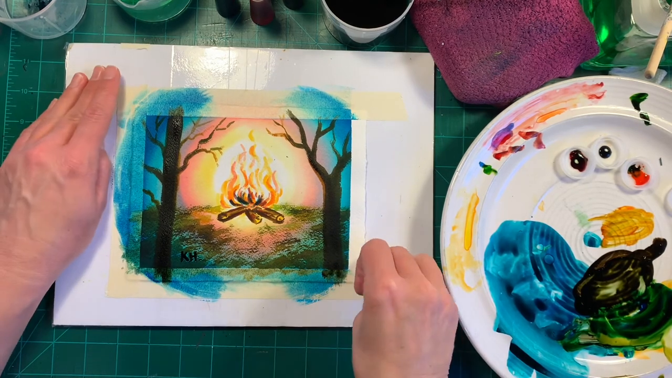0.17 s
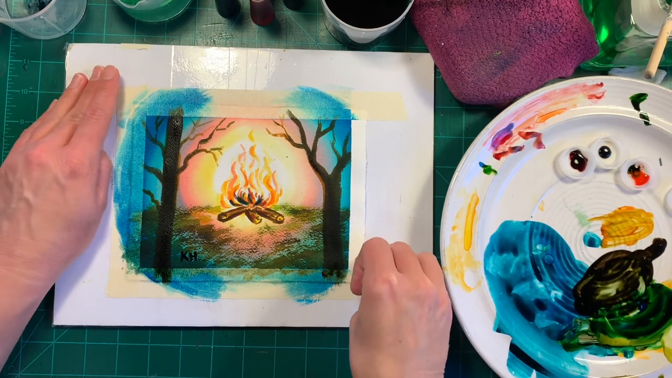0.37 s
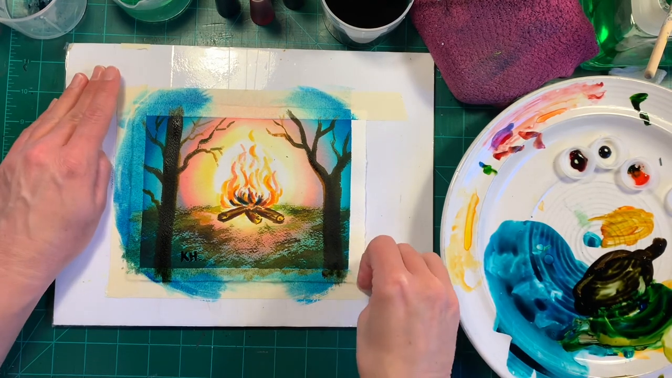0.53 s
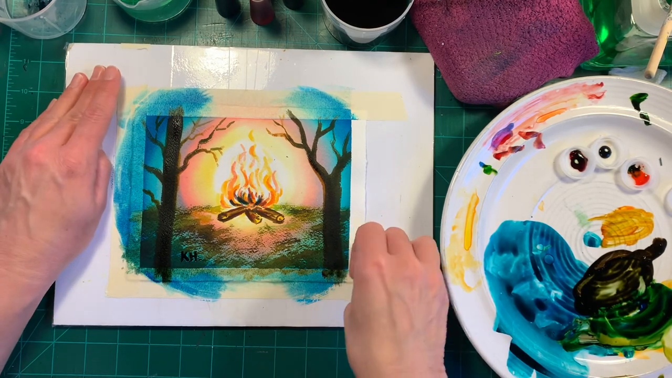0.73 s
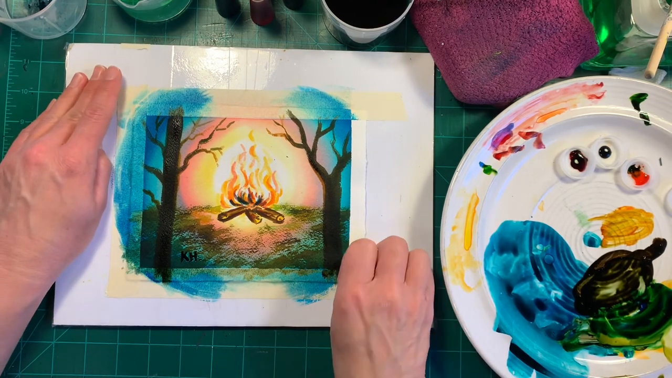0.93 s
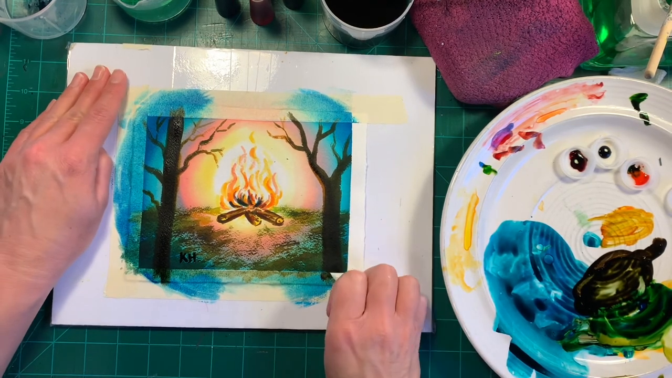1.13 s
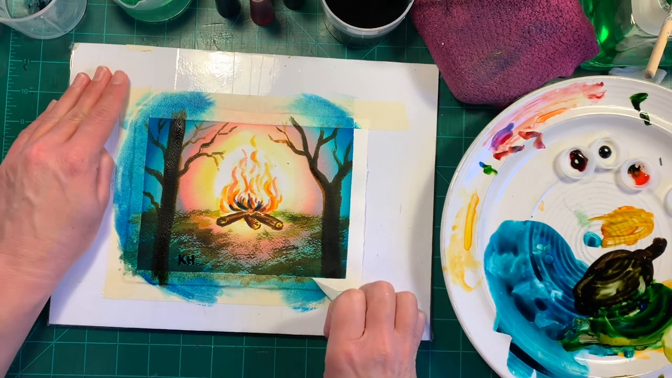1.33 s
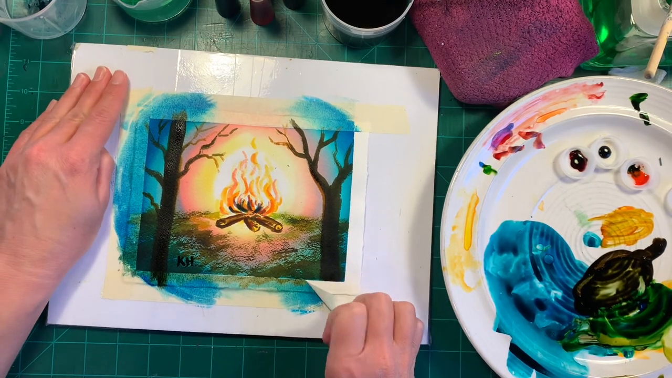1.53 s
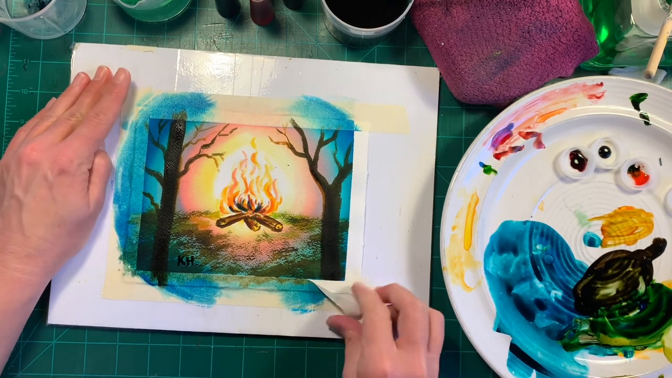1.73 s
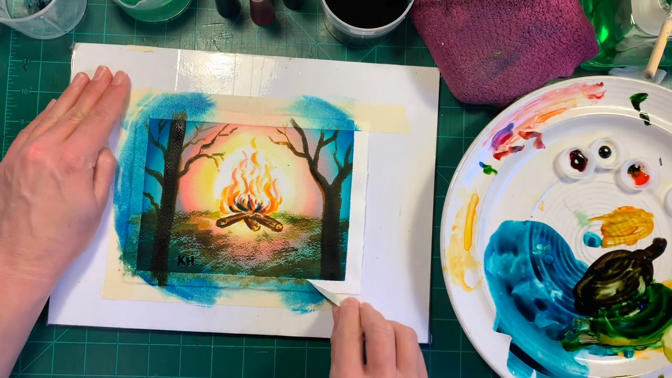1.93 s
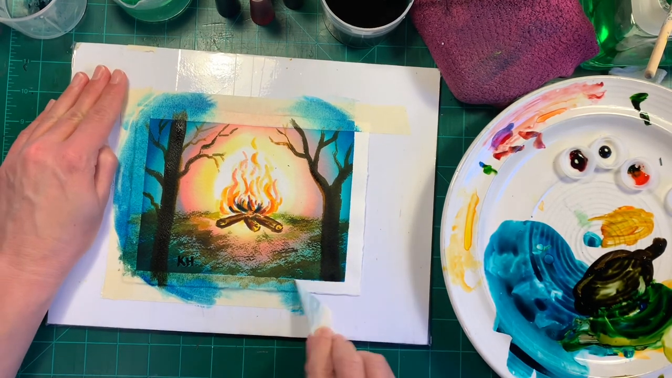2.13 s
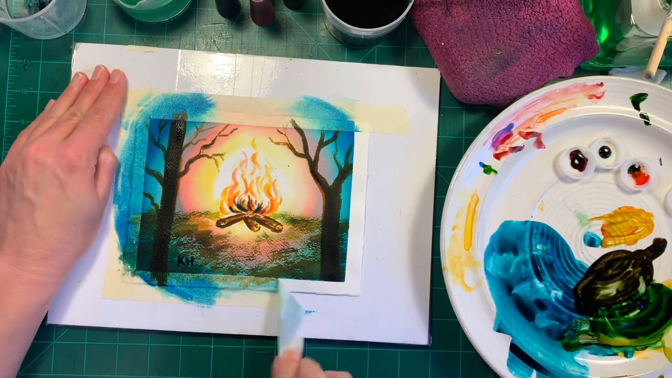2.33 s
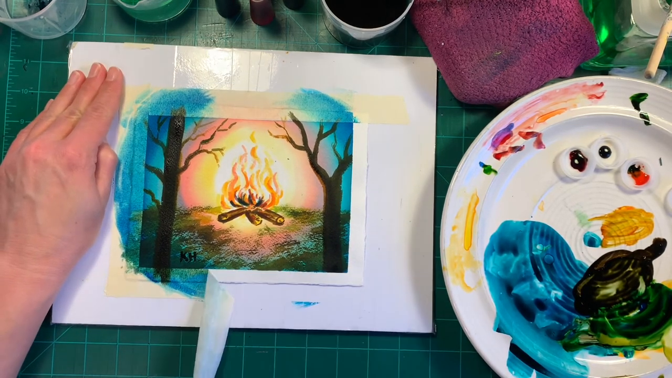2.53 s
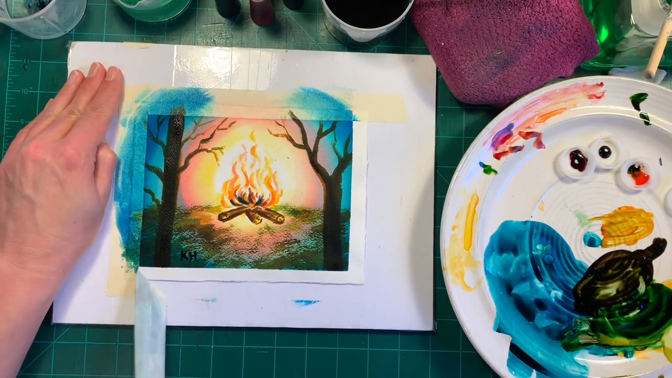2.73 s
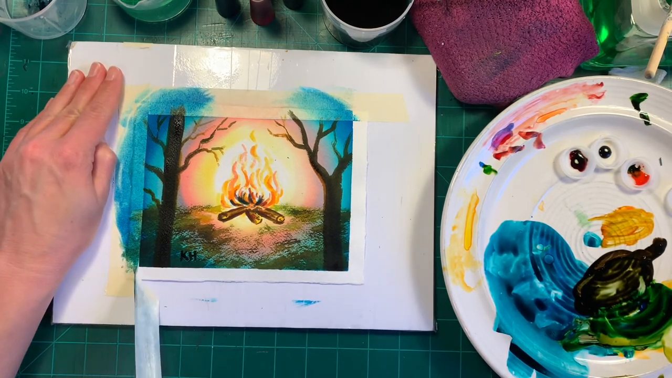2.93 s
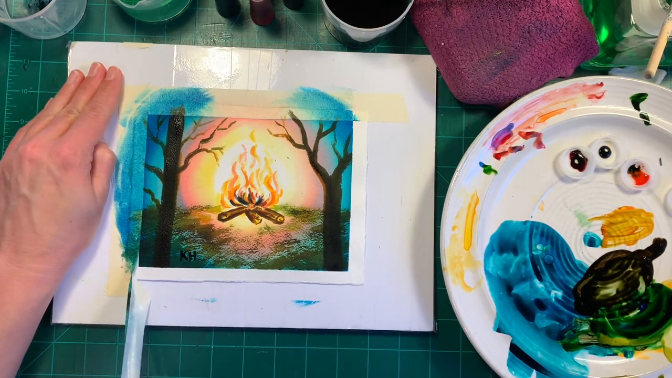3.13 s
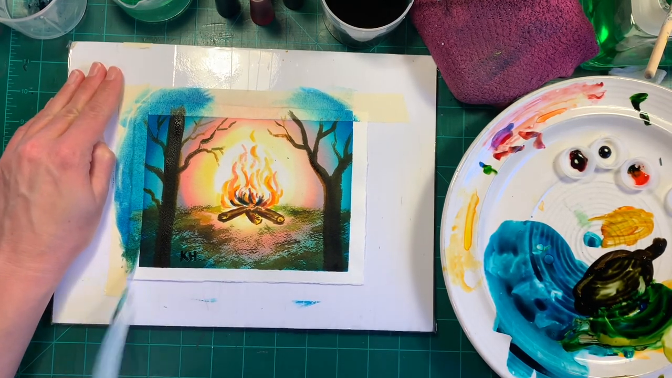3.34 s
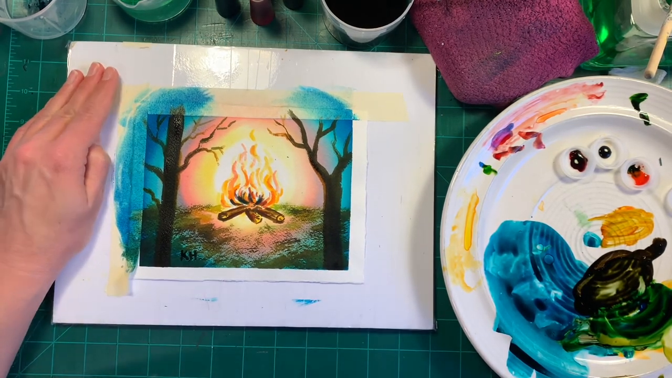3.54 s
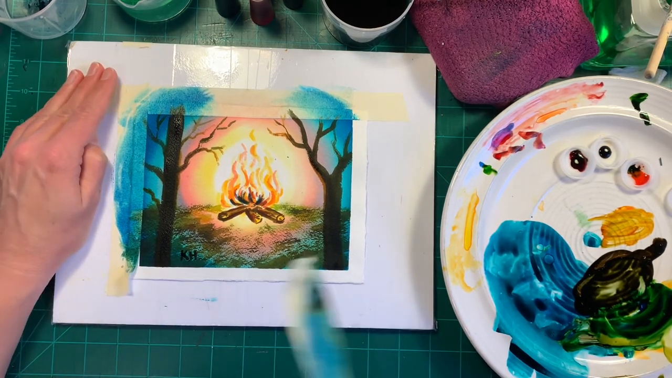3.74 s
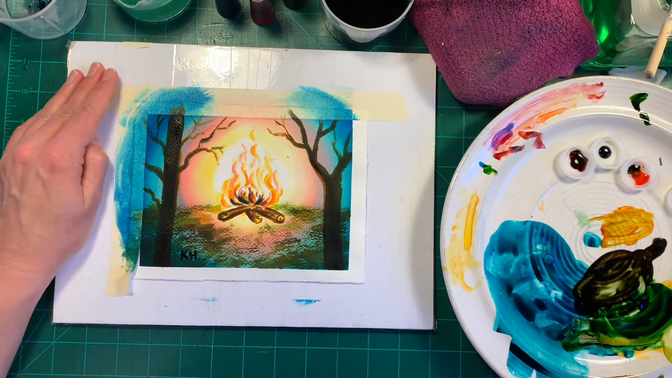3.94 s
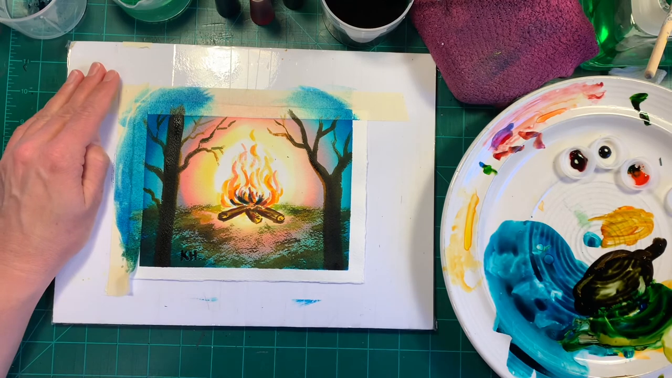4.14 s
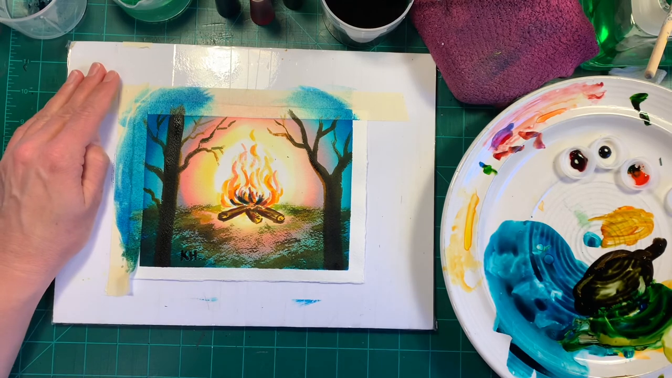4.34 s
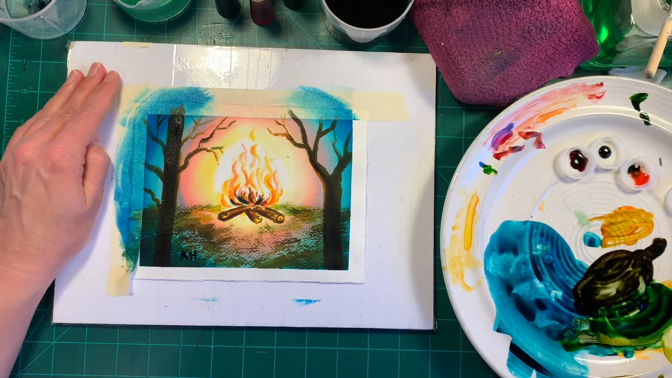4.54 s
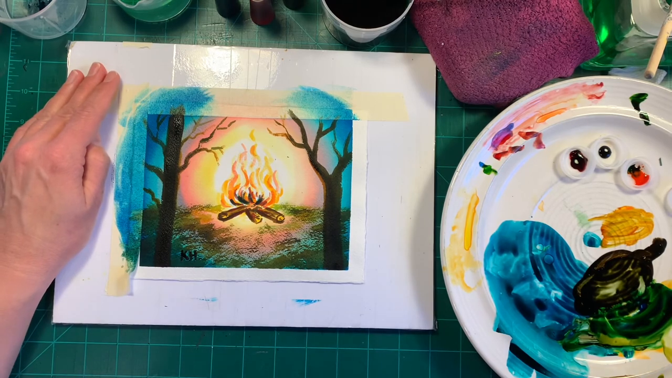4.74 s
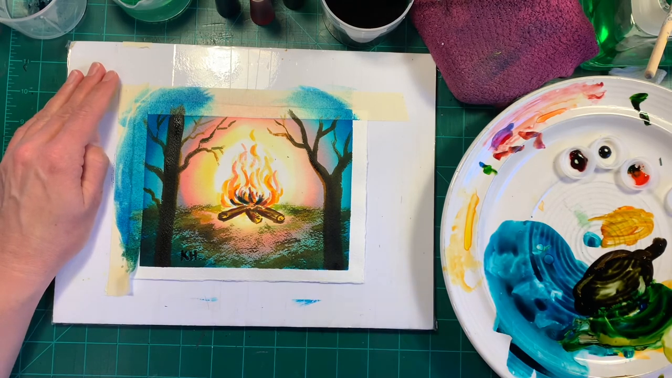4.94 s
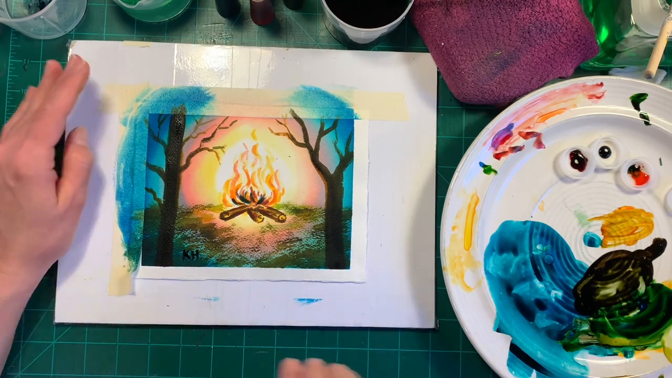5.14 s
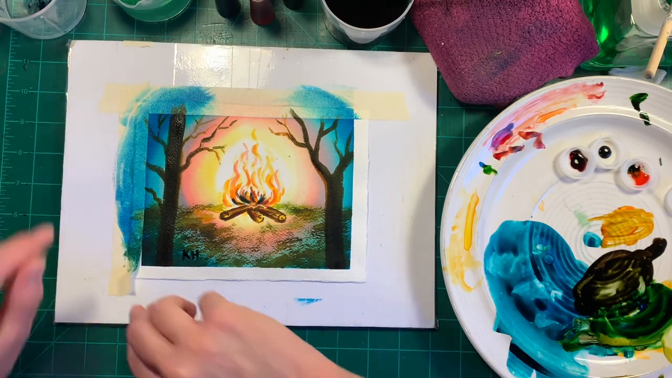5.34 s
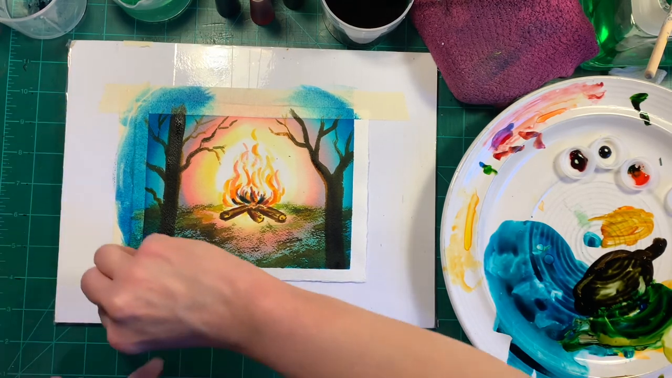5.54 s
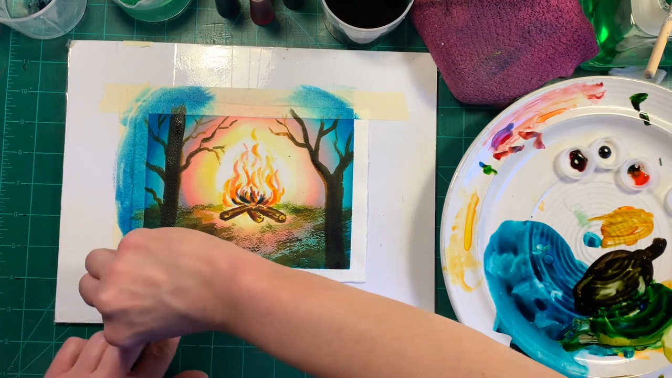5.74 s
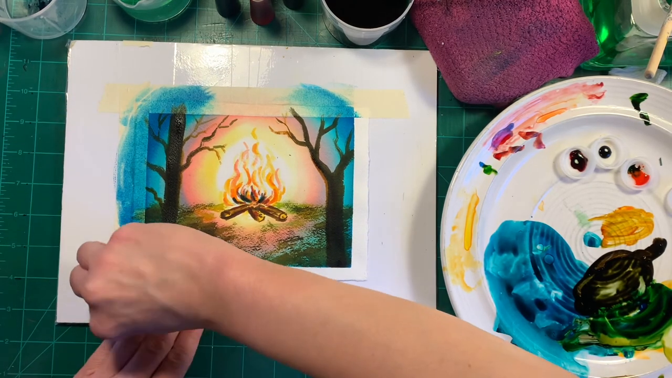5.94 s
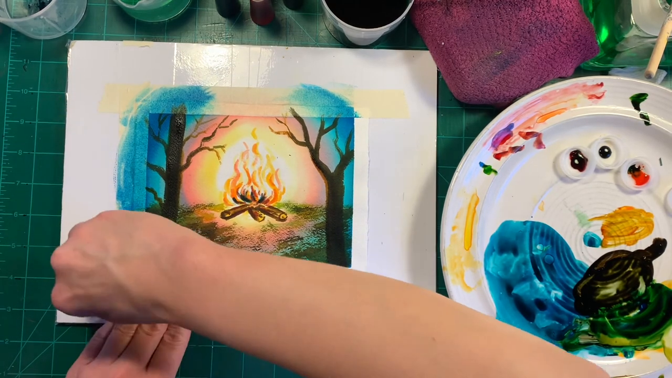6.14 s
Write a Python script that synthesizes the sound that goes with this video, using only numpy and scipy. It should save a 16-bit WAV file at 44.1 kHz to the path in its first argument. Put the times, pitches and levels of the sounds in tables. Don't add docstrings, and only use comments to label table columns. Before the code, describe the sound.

Close-up at a craft table in a small furnished room, over very faint hiss and a low house murmur. A hand settles on a board at 0 s, with a dull, soft knock at 0.2 s and sparse tiny ticks. From 0.8 to 1.2 s a fingernail scratches for the tape edge, then a finger slides brightly over paper until 1.5 s. Small pinches, a soft knock near 1.7 s and picking lead to the loud part: masking tape rips in crackling bursts at 2.06-2.19, 2.3-2.55 and 2.59-2.75 s, the first with separate cracks and a dull thrum, the later ones denser and brighter. Slack tape rustles and crackles from 2.8 s until a sharp snap at 3.34 s. Then near quiet: a faint squeeze at 3.65 s, light crumples, ticks and a soft thud around 4.4-4.8 s, ticks near 5.1 s, and fresh edge picking from 6 s to the end.

```python
import sys
import numpy as np
from scipy import signal
from scipy.fft import rfft, irfft
from scipy.io import wavfile
from scipy.ndimage import uniform_filter1d

SR = 44100
rng = np.random.default_rng(int(sys.argv[2]) if len(sys.argv) > 2 else 0)


def unload_audio(sound):
    columns = np.transpose(np.atleast_2d(sound))
    steps = np.round(np.clip(columns, -1, 1) * 32767)
    wavfile.write(sys.argv[1], SR, steps.astype(np.int16))


def nominal_scale(level):
    x = np.asarray(level, float) / 20
    return 10 ** x


N = 276948
T = np.arange(N) / SR


def unit(x):
    return x / np.sqrt(np.mean(x ** 2))


def ring(x, hz, width):
    return signal.lfilter(*signal.iirpeak(min(hz, 0.45 * SR), hz / width, SR), x)


def fading(x, t60):
    return signal.lfilter([1], [1, -np.exp(-np.log(1000) / (t60 * SR))], x)


def colour(x, points, size=4096):
    hz, db = np.transpose(points)
    bins_hz = np.arange(size // 2 + 1) * SR / size
    log_gain = np.interp(np.log(bins_hz + 1), np.log(hz), db) * np.log(10) / 20
    fold = irfft(log_gain)
    fold[1:size // 2] *= 2
    fold[size // 2 + 1:] = 0
    response = irfft(np.exp(rfft(fold)))
    return signal.fftconvolve(x, response)[:len(x)]


def trim_treble(x, high_db):
    high_pass = signal.butter(2, 8000, "high", fs=SR, output="sos")
    return x + (nominal_scale(high_db) - 1) * signal.sosfiltfilt(high_pass, x)


def tinted(tables, tint):
    return [[(*row, *tint) for row in table] for table in tables]


def played(tables, silent_db=-120):
    out = np.zeros((len(tables[0][0]) - 1, N))
    out[0] = silent_db
    for table in tables:
        s, *columns = np.transpose(table)
        inside = (T >= s[0]) & (T <= s[-1])
        out[:, inside] = [np.interp(T[inside], s, c) for c in columns]
    return out


def rustle(tables, rings, per_s, spread_db, smooth):
    db, *rel_db = played(tables)
    grains = (rng.random(N) < per_s / SR) * nominal_scale(spread_db * rng.exponential(size=N))
    pressure = unit(fading(grains, 0.0045)) + smooth
    out = np.zeros(N)
    for modes, rel in zip(rings, [0] + rel_db):
        body = np.zeros(N)
        for hz, width, ring_db in modes:
            knots = T[::2048]
            wander_db = 2 * np.interp(T, knots, rng.standard_normal(len(knots)))
            force = pressure * rng.standard_normal(N)
            body += nominal_scale(ring_db + wander_db) * ring(ring(force, hz, 2.1 * width), hz, width)
        out += uniform_filter1d(nominal_scale(db + rel), size=60) * unit(body)
    return out


# frequency in Hz, density in dB per Hz.
TAPE = [(88, -54), (150, -17.5), (534, -5.5), (1140, -7), (1660, -7), (2700, -1), (3620, -0.5),
        (6390, -0.5), (10600, -5), (14500, -9.5), (16500, -10.5)]
# frequency in Hz, width in Hz, level in dB.
TAPE_RINGS = [(1800, 302, -3), (3635, 440, -9.5), (5150, 420, -9), (6500, 430, -12), (10400, 1100, -9)]


def cracks(rows, click, broad, sharp, rise_s, tape):
    t = np.arange(8192) / SR
    out = np.zeros(N + len(t))
    top = int(rise_s * SR) + 1
    for s, db, hz, t60, high_db in rows:
        decay = np.exp(-np.log(1000) * t / max(t60, 0.002))
        swell = np.minimum(t * SR / top, 1) ** 2
        force = rng.standard_normal(len(t)) * decay * swell
        force[top] += click
        rings = np.zeros(len(t))
        for ring_hz, width, ring_db in TAPE_RINGS:
            rings += nominal_scale(ring_db + 2.4 * rng.standard_normal()) * ring(force, ring_hz, width)
        crack = trim_treble(colour(broad * force + tape * rings, TAPE, size=512), high_db)
        crack += ring(force, hz, hz / sharp)
        out[int(s * SR):][:len(t)] += nominal_scale(db) * crack / np.abs(crack).max()
    return out[:N]


def runs(rows, t60, scatter_db, jitter=0.5, count=30):
    out = []
    for start, end, per_s, db in rows:
        gap, size, pick = rng.standard_normal((count, 3)).T
        at = start + np.cumsum(np.exp(jitter * gap)) / per_s
        hz = np.array(TAPE_RINGS)[(np.abs(pick) * count).astype(int) % 4 + 1, 0]
        out += [(s, db + scatter_db * d, f, t60) for s, d, f in zip(at, size, hz) if s < end]
    return out


# frequency in Hz, density in dB per Hz.
HISS = [(15, -35.5), (25, 0), (40, -11.5), (87, -24.5), (206, -27.5), (293, -31.5), (363, -33),
        (734, -37.5), (6050, -44.5), (14800, -50.5), (16000, -46)]
# frequency in Hz, width in Hz, rms level in dB.
HOUSE = [(113.5, 8.5, -82.5), (410, 58, -90.5)]
# time in seconds, level in dB.
SWAY = [(0.0, -49.5), (0.54, -53.5), (0.63, -60), (2.43, -54.5), (3.25, -61.5), (3.38, -45), (3.83, -49.5),
        (4.06, -55), (4.42, -44), (4.58, -53), (5.37, -55), (5.47, -41.5), (5.79, -42), (6.28, -60)]


def air():
    hiss = nominal_scale(-67.5) * unit(colour(rng.standard_normal(N), HISS))
    murmur = sum(nominal_scale(db) * unit(ring(rng.standard_normal(N), hz, width)) for hz, width, db in HOUSE)
    slow_band = signal.butter(2, (2.5, 6), "band", fs=SR, output="sos")
    sway = signal.sosfilt(slow_band, rng.standard_normal(N))
    sway /= np.sqrt(uniform_filter1d(sway ** 2, size=SR // 5) + 1e-12)
    return hiss + murmur + nominal_scale(np.interp(T, *np.transpose(SWAY))) * sway


# frequency in Hz, width in Hz, level in dB.
BOARD = [(233, 160, -1), (420, 36, 4.5), (730, 340, -4), (1112, 120, -8.5)]
# frequency in Hz, width in Hz, level in dB.
SLIDE_RINGS = [
    [(2330, 1020, 0.5), (3630, 1500, -10)],
    [(5070, 450, -1.2), (5630, 456, -0.79)],
    [(6700, 3500, -4.5), (9900, 2500, 1), (12200, 5200, -13)],
    BOARD,
]
# time in seconds, level in dB.
BRUSH = [
    [(0.0, -69), (0.022, -87.5), (0.19, -73.5), (0.37, -78.5), (0.75, -88)],
    [(3.45, -89), (3.6, -86), (4.1, -95.5)],
]
# middle, upper and board rings in dB re the lower rings.
BRUSH_COLOUR = (-5, -11, 7.9)


def brushing():
    return rustle(tinted(BRUSH, BRUSH_COLOUR), SLIDE_RINGS, per_s=1200, spread_db=2.2, smooth=1.2)


# time in seconds, peak in dB, ring in Hz, t60 in seconds.
THUDS = [
    (0.004, -53, 62.6, 0.058),
    (0.192, -42, 119, 0.084),
    (1.73, -51, 117, 0.075),
    (2.604, -72.5, 200, 0.12),
    (3.34, -70, 115, 0.12),
    (4.523, -56.5, 109.8, 0.17),
]


def thuds():
    rows = [(*row, 0) for row in THUDS]
    return cracks(rows, click=0, broad=0, sharp=0.73, rise_s=0.0078, tape=0)


# time in seconds, peak in dB,
# ring in Hz, t60 in seconds.
TICKS = [(0.2023, -47, 1010, 0.024), (0.379, -56.5, 2060, 0.063), (0.4668, -51.5, 4550, .09),
         (0.612, -56, 2370, 0.021), (0.9686, -43.5, 5860, 0.019), (1.0637, -40, 5100, .021),
         (1.1184, -42, 6400, 0.0098), (1.2319, -45.5, 10400, .023), (1.5792, -40.5, 2000, 0.012),
         (1.727, -48, 1700, 0.015), (1.793, -48, 1900, 0.029), (1.8358, -44, 4970, 0.0091),
         (1.94, -43, 2280, 0.01), (1.951, -38, 7950, 0.009), (3.0246, -42.5, 3340, 0.015),
         (3.0792, -49, 10500, 0.12), (3.2283, -46.5, 8970, 0.055), (4.0521, -61, 4940, 0.029),
         (4.3644, -63, 1073, 0.033), (4.4252, -53, 1036, 0.032), (4.5268, -46.5, 1880, 0.034),
         (4.6907, -54, 1500, 0.065), (4.7744, -57.5, 7000, 0.028), (5.0061, -52.5, 2860, 0.028),
         (5.1029, -45.5, 9150, 0.021), (5.1164, -46.5, 2330, 0.02), (5.626, -58.5, 1610, 0.039),
         (5.9737, -47.5, 5630, 0.012), (6.0182, -49, 5260, 0.033), (6.0658, -50.5, 5200, 0.043),
         (5.1035, -49, 2145, .03), (4.4965, -61, 5000, .02), (5.018, -57, 5000, .02),
         (.6767, -65, 9000, .015), (.726, -61.5, 2000, 0.048), (2.867, -50, 10400, 0.036),
         (2.9814, -52, 3400, .024), (3.0976, -42.5, 8600, 0.061), (3.1746, -51, 5700, .04),
         (3.2473, -50, 8800, .05), (4.4394, -51.5, 1077, 0.016), (4.6436, -65.5, 4005, 0.022),
         (5.1394, -57, 3990, .02), (5.989, -53.5, 6090, 0.013), (6.0045, -56, 5400, 0.027),
         (6.0864, -52, 5170, 0.027), (6.117, -53, 5170, 0.026), (6.1388, -54, 5470, 0.047)]
# start and end in seconds, cracks per second, mean peak in dB.
CRACKLES = [
    (2.95, 3.04, 98, -54.5),
    (3.08, 3.3, 60, -54),
]


def ticks():
    treble_db = -4
    rows = [(*row, treble_db) for row in TICKS + runs(CRACKLES, 0.02, 2.5)]
    return cracks(rows, click=1.2, broad=0.33, sharp=4.0, rise_s=0.0006, tape=0)


# frequency in Hz, width in Hz, level in dB.
NAIL_RINGS = [
    [(1890, 630, -0.5), (2570, 1300, -9.5), (3300, 332, 1)],
    [(5420, 1100, 7.5), (7080, 810, -6.5)],
    [(8300, 690, 3.5), (10400, 2200, 4), (13770, 7500, -11)],
    BOARD,
]
# time in seconds, level in dB.
NAIL = [
    [(0.79, -95), (0.804, -71.5), (0.86, -65.5), (.9, -68), (1.05, -60), (1.19, -73)],
]
# middle, upper and board rings in dB re the lower rings.
NAIL_COLOUR = (3.3, 0, -7)


def nail_scratch():
    return rustle(tinted(NAIL, NAIL_COLOUR), NAIL_RINGS, per_s=1200, spread_db=2.5, smooth=0.8)


# time in seconds, level in dB.
SLIDE = [
    [(1.19, -76.5), (1.238, -63.5), (1.43, -73), (1.5, -86)],
]
# middle, upper and board rings in dB re the lower rings.
SLIDE_COLOUR = (-4, 4.5, -13.5)


def sliding():
    return rustle(tinted(SLIDE, SLIDE_COLOUR), SLIDE_RINGS, per_s=1200, spread_db=2.2, smooth=1.2)


# frequency in Hz, width in Hz, level in dB.
CRUMPLE_RINGS = [
    [(1500, 550, 0.5), (2120, 600, -2.5), (3400, 1043, -6.5)],
    [(5440, 1800, 0)],
    [(9350, 4600, 0)],
    [(500.4, 258, 2), (810, 500, 3.5)],
]
# start in seconds, hold in seconds, level in dB, treble in dB,
# low rings in dB.
CRUMPLE = [
    (1.576, 0.0034, -59.5, -29, -9),
    (1.724, 0.003, -70, -4, -12),
    (3.644, 0.056, -68.5, 0, -21.5),
    (4.365, 0.035, -79, -12.5, 4.5),
    (4.42, 0.013, -74.5, 4, 0),
    (4.522, 0.032, -66, -9, -10),
    (4.684, 0.016, -71.5, -8.5, 9),
    (4.71, 0.043, -80, -10, 9),
    (4.752, 0.015, -80, 7, 4),
    (5.109, 0.034, -71.5, -5, -4.5),
]


def crumpling():
    drop_db, fade_db_per_s, top_db = 25, 504, -2
    tables = []
    for s, hold, db, treble_db, low_db in CRUMPLE:
        tint = (treble_db, treble_db + top_db, low_db)
        held_until = s + hold
        gone = held_until + drop_db / fade_db_per_s
        tables.append([(s, db, *tint), (held_until, db, *tint), (gone, db - drop_db, *tint)])
    return rustle(tables, CRUMPLE_RINGS, per_s=900, spread_db=2.4, smooth=0.8)


# frequency in Hz, width in Hz, level in dB.
PICK_RINGS = [
    [(2240, 2300, -2), (3740, 613, 0)],
    [(5260, 996, 3), (6800, 1500, -3)],
    [(8600, 1500, 6), (10900, 2500, 1.5), (14500, 2900, -6.5)],
    BOARD,
]
# time in seconds, level in dB.
PICK = [
    [(1.86, -84), (1.912, -73), (1.936, -70), (2.062, -60.5)],
    [(5.97, -79.5), (6.1, -85.5), (6.15, -81), (6.18, -66.5), (6.233, -67.5), (6.28, -62.5)],
]
# middle, upper and board rings in dB re the lower rings.
PICK_COLOUR = (6.7, 1.5, -21)


def picking():
    return rustle(tinted(PICK, PICK_COLOUR), PICK_RINGS, per_s=1000, spread_db=2.2, smooth=0.8)


# time of the peak in seconds, peak in dB, ring in Hz.
SLIPS = [(2.059, -14, 6430), (2.0626, -22, 3700), (2.0923, -13, 3400), (2.0952, -34, 7100),
         (2.5293, -21.5, 6500), (2.1038, -19.5, 3850), (2.107, -23, 3620), (2.1235, -13.5, 3670),
         (2.1312, -21.5, 5290), (2.1381, -22.5, 5150), (2.1473, -19, 5200), (2.1525, -24.5, 3510),
         (2.7485, -21.5, 8300), (2.1661, -20, 3816), (2.2095, -40, 3400), (2.3105, -23, 3490),
         (2.3228, -22.5, 5780), (2.3313, -17, 3400), (2.3384, -19.5, 5500), (2.348, -20.5, 5800),
         (2.3563, -19.5, 5500), (2.3663, -23, 5900), (2.3799, -19, 4220), (2.3844, -21, 4166),
         (2.389, -21, 3710), (2.3948, -23, 6670), (2.592, -20.5, 6500), (2.6005, -18, 3400),
         (3.3379, -12.5, 8360), (3.3451, -15, 5970)]


def single_slips():
    lead_s, level_db = 0.0011, -3
    rows = [(s - lead_s, db + level_db, hz, 0.011, -3) for s, db, hz in SLIPS]
    return cracks(rows, click=1.3, broad=0.5, sharp=5.0, rise_s=0.001, tape=2.2)


# time in seconds, level of the dense slips in dB.
PULLS = [
    [(2.059, -36), (2.075, -46.5), (2.09, -47), (2.13, -40), (2.165, -38.5), (2.19, -54)],
    [(2.307, -45), (2.37, -36), (2.44, -31.5), (2.488, -33), (2.51, -46.5), (2.56, -56.5)],
    [(2.589, -42), (2.655, -33.5), (2.668, -30.5), (2.733, -34), (2.739, -44), (2.76, -46)],
    [(3.334, -30.5), (3.338, -33), (3.352, -31.5), (3.365, -53), (3.42, -69.5)],
]
# board thrum in dB, treble trim in dB, share of unbroken tearing 0-1.
PULL_FEEL = [
    (-57.5, -7, 0.43),
    (-65.5, -3, 0.5),
    (-71.5, -0.5, .22),
    (-66.5, 0.5, .9),
]


def rip():
    per_s, jitter, scatter_db, ring_scatter_db = 430, 0.3, 2.2, 3.0
    tables = [tinted([pull], feel)[0] for pull, feel in zip(PULLS, PULL_FEEL)]
    db, thrum_db, high_db, tearing = played(tables)
    chance = rng.standard_normal((3000, 2 + len(TAPE_RINGS)))
    gaps = np.exp(jitter * chance[:, 0]) * SR / per_s
    at = np.minimum(np.cumsum(gaps), N - 1).astype(int)
    size_db = scatter_db * chance[:, 1]
    noise = rng.standard_normal(N)

    def force(slip_db):
        slips = np.zeros(N)
        slips[at] = nominal_scale(slip_db)
        return 4.5 * slips + noise * (fading(slips, 0.006) + np.clip(tearing, 0, 1))

    out = force(size_db)
    for (hz, width, ring_db), own in zip(TAPE_RINGS, chance[:, 2:].T):
        out += nominal_scale(ring_db) * ring(force(size_db + ring_scatter_db * own), hz, width)
    out = colour(out, TAPE)
    out /= np.sqrt(uniform_filter1d(out ** 2, size=1500) + 1e-9)
    tape = nominal_scale(db - 1.5) * trim_treble(out, high_db + 3.0)
    thrum = unit(ring(ring(rng.standard_normal(N), 112, 6.1), 73, 30))
    shaking = uniform_filter1d((db > -99) * nominal_scale(thrum_db), size=900)
    return tape + shaking * thrum


# frequency in Hz, width in Hz, level in dB.
SLACK_RINGS = [
    [(1630, 1100, 1), (2360, 570, 4.5), (3400, 1400, 5.1)],
    [(4530, 540, 0), (6100, 6100, -3.5)],
    [(8600, 920, 1), (12100, 4900, 2.5), (13640, 2000, -13)],
    BOARD,
]
# time in seconds, level in dB.
SLACK = [
    [(2.18, -59), (2.264, -70), (2.302, -57)],
    [(2.8, -68.5), (2.92, -66.5), (2.93, -73), (3.036, -65.5), (3.326, -67)],
    [(5.6, -84.5), (5.65, -83.5), (5.8, -87), (5.95, -83.5)],
]
# middle, upper and board rings in dB re the lower rings.
SLACK_COLOUR = (-1.5, 0.85, -12.5)


def slack_tape():
    return rustle(tinted(SLACK, SLACK_COLOUR), SLACK_RINGS, per_s=900, spread_db=2.6, smooth=0.7)


# start and end in seconds, slips per second, mean peak in dB.
STUTTERS = [
    (2.4, 2.49, 200, -22),
    (2.488, 2.51, 191, -17),
    (2.604, 2.662, 270, -19),
    (2.665, 2.735, 200, -22),
]


def stutters():
    rows = [(*row, -3) for row in runs(STUTTERS, 0.006, 2.5, jitter=0.35)]
    return cracks(rows, click=2.5, broad=0.6, sharp=6.0, rise_s=0.0008, tape=1.5)


# time in seconds, peak in dB, ring in Hz, t60 in seconds, treble trim in dB.
SNAP_RING = [
    (3.337, -29.5, 2800, 0.24, 0),
]


def snap():
    return cracks(SNAP_RING, click=0, broad=0, sharp=1.65, rise_s=0.002, tape=0)


# frequency in Hz, t60 in seconds.
ROOM = [(200, 0.65), (1000, 0.43), (3000, 0.23), (8000, 0.22), (16000, 0.22)]


def room(x):
    level_db, gap_s = -12, 0.0011
    t = np.arange(SR // 2) / SR
    hz, t60 = np.transpose(ROOM)
    noise = rng.standard_normal(len(t))
    tail = np.zeros(len(t))
    for f in 125 * 2.0 ** np.arange(8):
        band_t60 = np.interp(np.log(f), np.log(hz), t60)
        tail += ring(noise, f, f) * np.exp(-np.log(1000) * t / band_t60)
    tail *= t > gap_s
    return nominal_scale(level_db) * signal.fftconvolve(x, tail / np.sqrt(np.sum(tail ** 2)))[:N]


def scene():
    table = brushing() + thuds() + ticks() + nail_scratch() + sliding() + crumpling() + picking()
    table += single_slips() + rip() + slack_tape() + stutters() + snap()
    return (table + room(table) + air())[None]


def band_limit(x):
    return signal.sosfilt(signal.butter(12, 16820, fs=SR, output="sos"), x)


def record(dry):
    low_pass = signal.ellip(8, 0.2, 30, 15900, fs=SR, output="sos")
    return band_limit(signal.sosfilt(low_pass, dry))


dry = scene()
out = record(dry)
unload_audio(out)
```